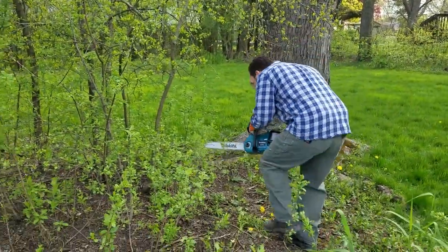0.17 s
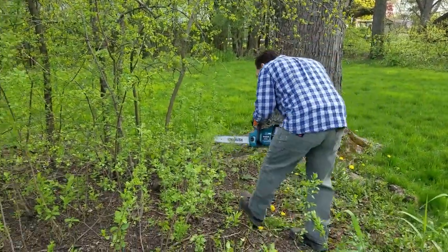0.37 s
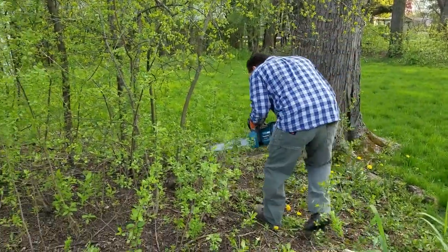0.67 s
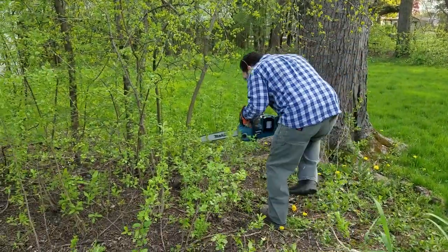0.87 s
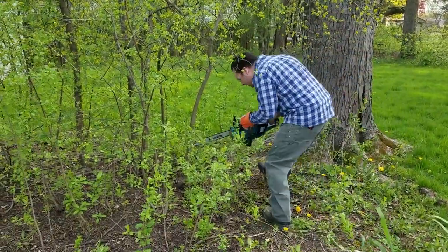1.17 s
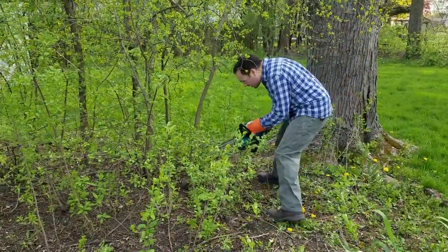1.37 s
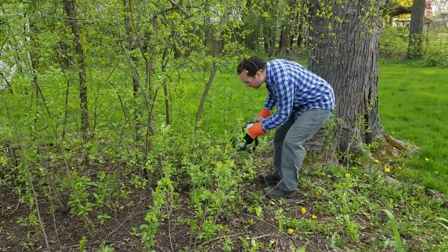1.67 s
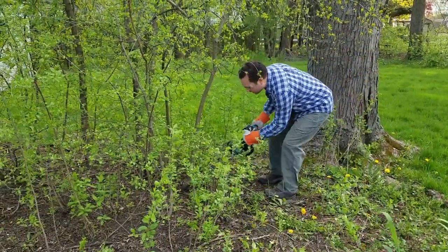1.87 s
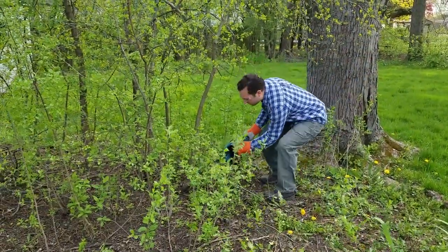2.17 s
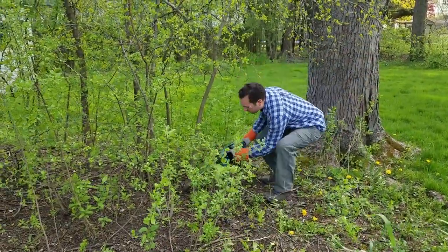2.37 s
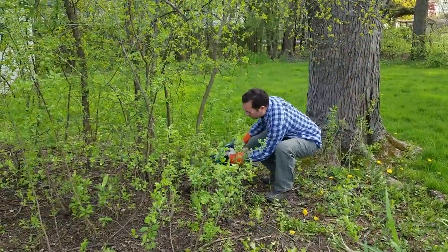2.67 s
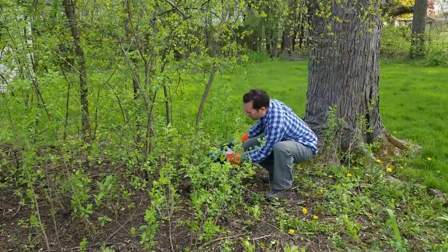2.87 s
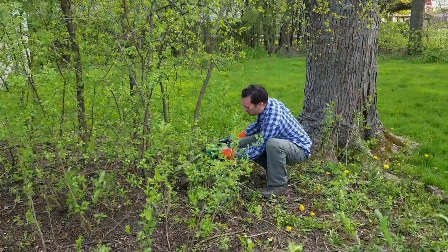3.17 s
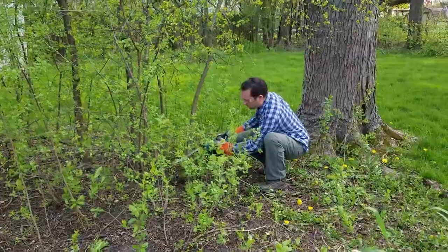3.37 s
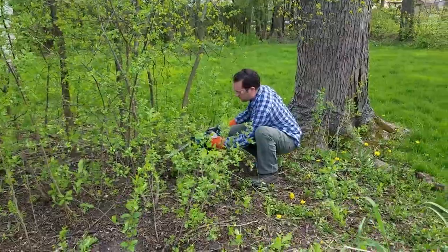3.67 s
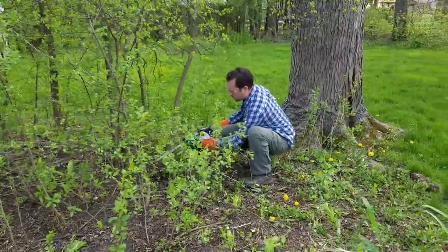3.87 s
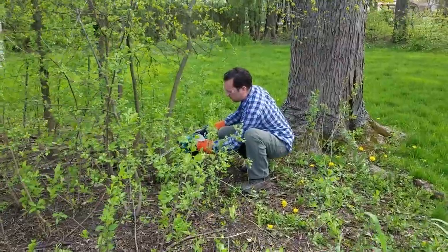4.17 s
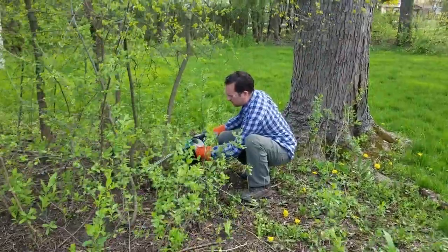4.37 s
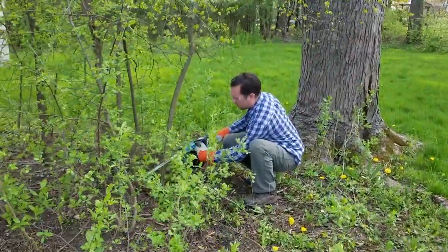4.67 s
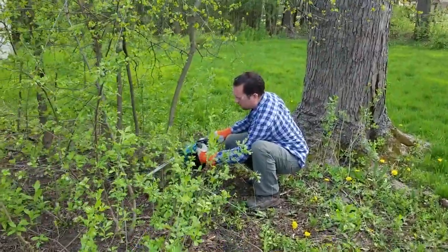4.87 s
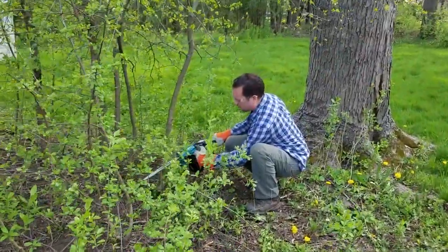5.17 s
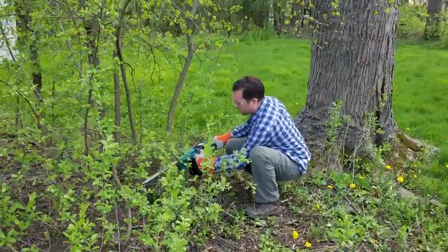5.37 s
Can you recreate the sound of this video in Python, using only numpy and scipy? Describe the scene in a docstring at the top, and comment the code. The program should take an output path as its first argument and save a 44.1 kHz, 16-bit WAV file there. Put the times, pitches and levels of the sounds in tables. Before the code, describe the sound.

Twigs and dry leaves crackle underfoot before a cordless chainsaw starts, whining and rattling steadily as its chain bites into garden shrubs.

```python
"""A garden: a man steps through dry twigs and leaves, then starts a cordless chainsaw a few metres away.
The slack chain clacks; the motor chirps through the housing's resonances and settles into a whine.
The chain rattles and hisses round its bar and churns harder once it bites into the brush.
A low outdoor rumble and the hush of the open air lie under it all."""
import sys
import numpy as np
from scipy import signal
from scipy.fft import rfft, irfft, next_fast_len
from scipy.io import wavfile
from scipy.ndimage import uniform_filter1d, map_coordinates

SR = 44100
rng = np.random.default_rng(int(sys.argv[2]) if len(sys.argv) > 2 else 0)


def generate_wav(signal):
    """Clip the signal to [-1, 1] and save it as 16-bit WAV at the path in sys.argv[1]."""
    frames = np.transpose(np.atleast_2d(signal))
    scaled = np.clip(frames, -1, 1) * 32767
    pcm = np.round(scaled).astype(np.int16)
    wavfile.write(sys.argv[1], SR, pcm)


N = 243873
T = np.arange(N) / SR
TRIGGER_S, LAUNCH_S = 2.075, 2.16  # the chain creeps, then the motor takes off
CREEP_HZ, GOVERNED_HZ = 6, 179  # shaft speeds
SIDES = np.array([[.5], [-.5]])  # splits a level or phase gap between left and right

# body of dry wood: (frequency [Hz], level [dB])
WOOD = [(300, -30), (700, -2), (950, 0.5), (1400, -0.5), (2050, -3.5), (2700, -5.5), (3500, -12.5),
        (5000, -33), (16000, -73)]
# bright edge of dry splinters: (frequency [Hz], level [dB])
SPLINTER = [(2500, -14), (4000, -1.5), (6000, 3.5), (8000, -2.5), (11000, 6), (13500, -3.5), (16000, -5.5)]
# stereo image of the chain and the leaves: (frequency [Hz], left-right likeness [0-1])
NEAR_LIKENESS = [(150, 1), (400, 1), (1300, 0.93), (2100, 0.42), (2600, 0.82), (3000, 0.74), (5400, 0.38),
                 (8000, 0.21), (15000, 0.13)]
# ring of the chain knocking on its bar: (frequency [Hz], level [dB])
CLACK_COLOUR = [(240, -55), (400, -12), (612, -14), (1040, 0), (1880, 0.5), (2360, -6), (2620, -1.5),
                (3450, -19), (7240, -26), (8060, -17.5), (15000, -43)]


def amp(db):
    """Decibels to gain."""
    return 10 ** (np.asarray(db) / 20)


def unit(x):
    """Scale to rms 1."""
    return x / np.sqrt(np.mean(x ** 2) + 1e-20)


def along(points, hz):
    """Read (frequency, value) points on a log axis."""
    freqs, values = np.transpose(points)
    return np.interp(np.log(hz + 1), np.log(freqs + 1), values)


def automation(points):
    """Read (time, value) points at every sample."""
    return np.interp(T, *np.transpose(points))


def wobble(rate):
    """A smooth random curve, rate knots a second."""
    return map_coordinates(rng.standard_normal(int(N * rate / SR) + 4), [T * rate])


def filtered(x, response):
    """Filter x by a complex response of frequency."""
    size = next_fast_len(N + SR // 2)
    return irfft(rfft(x, size) * response(np.fft.rfftfreq(size, 1 / SR)), size)[..., :N]


def coloured(x, spectrum):
    """EQ x by a spectrum, at rms 1."""
    return unit(filtered(x, lambda hz: amp(along(spectrum, hz))))


def resonance(hz, centre, width):
    """The complex response of one mode."""
    return 1j * hz * width / (centre ** 2 - hz ** 2 + 1j * hz * width)


def peaked(spectrum, pitch, lift_db):
    """A spectrum with one resonance raised above it."""
    hz = np.geomspace(100, 16000, num=200)
    bell_db = lift_db * np.abs(resonance(hz, pitch, .18 * pitch))
    return np.transpose([hz, along(spectrum, hz) + bell_db])


def pair(x, likeness):
    """Two unrelated signals become left and right of a given likeness."""
    turn = lambda hz: np.arccos(np.clip(along(likeness, hz), -1, 1)) / 2
    mid, side = filtered(x, lambda hz: np.array([np.cos(turn(hz)), np.sin(turn(hz))]))
    return np.array([mid + side, mid - side])


def add(track, s, x):
    """Mix x into the track at s seconds."""
    part = track[:, round(s * SR):][:, :x.shape[1]]
    part += x[:, :part.shape[1]]


def garden():
    """The bed: an uneven low rumble and the gently wavering hush of the open air."""
    # swell of the rumble: (time [s], relative level [dB])
    swell = [(0.0, -38.5), (0.21, -41), (0.49, -44), (0.68, -49.5), (1.43, -47.5), (1.89, -45.5),
             (2.19, -44), (3.43, -55.5), (4.24, -44.5), (5.53, -43)]
    # tone of each layer: (frequency [Hz], level [dB])
    rumble_colour = [(13, -39), (22, -17), (59, -5.5), (87, 2), (133, -2), (244, -10.5), (336, -10),
                     (468, -13.5), (530, -22.5), (600, -23), (780, -47), (1320, -120)]
    air_colour = [(150, -26), (250, -7), (380, -3.5), (520, -8.5), (780, -3), (1400, -13), (2200, -13),
                  (3500, -25), (5500, -27), (7800, -30.5), (9700, -20), (12000, -28), (15500, -23.5)]
    # their stereo image: (frequency [Hz], left-right likeness [1 and up is mono])
    rumble_likeness = [(30, 3), (70, 0.32), (140, 0.86), (300, 0.8)]
    air_likeness = [(60, 0.64), (180, 0.59), (550, 0.56), (1650, -0.15), (4970, -0.049), (15000, -0.15)]
    # lean of the rumble: (frequency [Hz], left over right [dB])
    rumble_pan = [(40, 3), (90, -3.5), (180, 0)]
    rumble = coloured(pair(rng.standard_normal((2, N)), rumble_likeness), rumble_colour)
    rumble = filtered(rumble, lambda hz: amp(SIDES * along(rumble_pan, hz)))
    rumble *= amp(automation(swell) + 2.5 + 2 * wobble(17))
    air_gain = amp(-45 + .54 * wobble(7.4))
    air = coloured(pair(rng.standard_normal((2, N)), air_likeness), air_colour)
    return rumble + air_gain * air


def thumps():
    """Dull thumps near the ground, and twigs knocking on the bar as it enters the brush: damped sines, leading
    on the left, louder on the right."""
    # each thump or knock: (time [s], level before panning [dB], pitch [Hz])
    hits = [(.02, -19, 188), (0.044, -25, 392), (.178, -26, 105), (.212, -25, 150), (.233, -26, 110),
            (1.707, -30, 101), (2.21, -31.5, 332), (2.294, -26, 140), (2.608, -24.5, 101),
            (4.075, -27, 620), (4.118, -24, 724)]
    attack_s, t60, lead_rad = .00064, .052, 1.1
    out = np.zeros((2, N))
    t = np.arange(SR // 8) / SR
    for s, db, pitch in hits:
        envelope = amp(db - 60 * t / t60) * (1 - np.exp(-t / attack_s))
        add(out, s, envelope * np.sin(2 * np.pi * pitch * t + lead_rad * SIDES) * amp([[-2], [1.5]]))
    return out


def ring(spectrum, size=1024):
    """The minimum-phase impulse response of a spectrum, energy 1."""
    cepstrum = irfft(np.log(amp(along(spectrum, np.fft.rfftfreq(size, 1 / SR)))))
    impulse = irfft(np.exp(rfft(2 * cepstrum[:size // 2], size) - cepstrum[0]))
    return impulse / np.linalg.norm(impulse)


def snap(spectrum, t60, scatter):
    """A sharp break and its brief scatter off the ground and stems, mono peak 1."""
    t = np.arange(SR // 10) / SR
    burst = scatter * rng.standard_normal((2, len(t))) * amp(-60 * t / t60)
    burst = (burst + burst.mean(axis=0)) / np.sqrt(2)
    burst[:, 0] += 1  # the direct click
    crack = signal.fftconvolve(burst, ring(spectrum)[None], axes=1)
    return crack / np.abs(crack.mean(axis=0)).max()


def twigs():
    """Twigs break underfoot, each a woody crack with a splintery top."""
    # each break: (time [s], relative wood level [dB], relative splinter level [dB], pitch [Hz])
    breaks = [(0.317, -45, -47, 851), (0.423, -19.5, -36, 2200), (0.437, -28, -43, 2200),
              (0.465, -24, -46, 2060), (0.496, -26, -41, 840), (0.507, -25, -38, 2070),
              (0.523, -24, -40, 2010), (0.663, -31.5, -44, 964), (1.156, -26.5, -40, 2070),
              (1.177, -25.5, -41, 2130), (1.219, -31, -41, 1170), (1.259, -18.5, -41, 1930),
              (1.325, -25, -46, 1880), (1.343, -30, -50, 921), (1.353, -30, -53, 1920),
              (1.361, -25, -48, 1320), (1.698, -16, -38, 1840), (1.783, -25, -35, 875)]
    out = np.zeros((2, N))
    for s, wood_db, splinter_db, pitch in breaks:
        add(out, s, amp(wood_db - 1.5) * snap(peaked(WOOD, pitch, lift_db=11), t60=.022, scatter=.08))
        add(out, s, amp(splinter_db + 15) * snap(SPLINTER, t60=.015, scatter=.12))
    # smaller sticks give way at random while he walks
    for s, db in zip(rng.uniform(.3, 2.05, size=22), rng.normal(-41, 1, size=22)):
        stick = snap(WOOD, t60=.025, scatter=.1) + snap(SPLINTER, t60=.016, scatter=.11)
        add(out, s, amp(db) * stick)
    return out


def leaf_litter():
    """Dry leaves crushed by the feet crackle in clumps of tiny grains."""
    # each crunch: (peak time [s], rise [s], level [dB], crisp over dull [dB], pitch [Hz])
    crunches = [(0.427, .006, -40, 3.5, 2200), (.515, .02, -49.5, 5, 2100),
                (.856, 0.0018, -38.5, -27, 1180), (1.223, 0.0033, -45, 4.5, 1100),
                (1.263, .003, -42, -4, 1900), (1.348, 0.021, -37.5, -2.5, 2010),
                (1.686, 0.024, -43, 6, 1800), (1.787, 0.0049, -47, 1, 2000), (1.85, 0.017, -48, 2.5, 2000)]
    decay_s = .028
    grains = rng.standard_normal((2, N)) * (rng.random(N) < .06) * amp(1.8 * wobble(220))
    crisp = coloured(grains, SPLINTER)
    narrowed = pair(grains, NEAR_LIKENESS)
    out = np.zeros((2, N))
    for s, rise_s, db, crisp_db, pitch in crunches:
        envelope = np.exp(np.minimum((T - s) / rise_s, (s - T) / decay_s))
        dull = coloured(narrowed, peaked(WOOD, pitch, lift_db=14.5))
        out += amp(db) * envelope * (dull + amp(crisp_db) * crisp)
    return out


def clacks():
    """The trigger clicks, and the slack chain knocks against the bar on its first slow turn."""
    # the chain takes up its slack: (time [s], peak level [dB])
    knocks = [(2.0728, -26), (2.086, -23), (2.104, -19), (2.1167, -26), (2.125, -19.5)]
    out = np.zeros((2, N))
    add(out, 2.081, amp(-22) * snap(SPLINTER, t60=.013, scatter=.17))
    for s, db in knocks:
        add(out, s, amp(db) * snap(CLACK_COLOUR, t60=.02, scatter=.14))
    return out


def patchy(x, depth_db):
    """Reflections off moving leaves and the bar lift and sink narrow bands for a moment."""
    bands = signal.stft(x, nperseg=1024)[2]
    patches = uniform_filter1d(rng.standard_normal(bands.shape[1:]), size=4, axis=0)
    patches = uniform_filter1d(patches, size=22, axis=1)
    return signal.istft(bands * amp(depth_db * unit(patches)), nperseg=1024)[1][:, :N]


def links(angle, spectrum, beat, patchy_db):
    """Countless link contacts, bunched three times a shaft turn, ring the bar."""
    bunching = 1 + beat * np.cos(3 * angle)
    contacts = rng.standard_normal((2, N)) * bunching * amp(.64 * wobble(120))
    return coloured(patchy(pair(contacts, NEAR_LIKENESS), patchy_db), spectrum)


def noise_band(centre_hz, width_hz):
    """Noise ringing in one narrow mode, rms 1."""
    return unit(filtered(rng.standard_normal(N), lambda hz: resonance(hz, centre_hz, width_hz) ** 2))


def chain(speed, angle, strain, load):
    """The chain rattles on the bar, hisses in its groove and churns in the brush."""
    # tone of each layer, low to high: (frequency [Hz], level [dB])
    churn_colour = [(110, -18), (170, -4.5), (250, -8), (310, -6.5), (365, 2.5), (440, -10), (620, -4),
                    (720, 4), (900, -19.5)]
    free_rattle = [(450, -29), (650, -17), (850, -6), (1150, -4), (1500, 0), (1900, 3.5), (2300, -0.5),
                   (2650, -2.5), (2950, -4), (3500, -67)]
    cutting_rattle = [(450, -24.5), (650, -20), (800, -7.5), (1150, -8.5), (1550, -1.5), (1800, -1.5),
                      (2050, -3), (2600, -2.5), (2850, -3.5), (3050, -16.5), (3500, -31)]
    hiss_colour = [(2400, -36), (3100, 0), (3800, 1), (4700, 0.5), (5400, 3), (6100, -0.5), (7000, -2.5),
                   (7600, -4), (8500, -20)]
    fizz_colour = [(6600, -45), (7600, -4.5), (8600, 3), (9900, 0.5), (11200, -1.5), (12800, -5.5),
                   (14500, -3.5), (16000, -6)]
    # their faders: (full-speed level [dB], per speed doubling [dB], strain lift [dB], load lift [dB])
    churn_law = (-52.5, 1.5, 15, 15.5)
    rattle_law = (-27, 1.6, 4, 4.5)
    hiss_law = (-30, 6, 4, 4)
    fizz_law = (-24, 8, 2, 4.5)
    doublings = np.log2(speed / GOVERNED_HZ)
    churn_db, rattle_db, hiss_db, fizz_db = [
        db + speed_db * doublings + strain_db * strain + load_db * load
        for db, speed_db, strain_db, load_db in (churn_law, rattle_law, hiss_law, fizz_law)]
    moving = np.clip((T - TRIGGER_S) / .05, 0, 1)
    # a slow chain rings the same few modes as its clacks; speed and load fill the gaps between them
    slow = np.clip((150 - speed) / 90, 0, 1)
    crawling = np.sqrt(slow) * links(angle, CLACK_COLOUR, beat=.3, patchy_db=1.5)
    free = np.sqrt((1 - slow) * (1 - load)) * links(angle, free_rattle, beat=.073, patchy_db=2)
    cutting = np.sqrt(load) * links(angle, cutting_rattle, beat=.15, patchy_db=.3)
    rattle = amp(rattle_db + .067 * wobble(9)) * (crawling + free + cutting)
    churn = amp(churn_db + 1.3 * wobble(6.7)) * links(angle, churn_colour, beat=.045, patchy_db=1)
    hiss = amp(hiss_db) * links(angle, hiss_colour, beat=.05, patchy_db=1.7)
    fizz = amp(fizz_db) * links(angle, fizz_colour, beat=.046, patchy_db=1.9)
    drone = amp(-44.5) * load * noise_band(171, width_hz=21)
    # the creeping chain scrapes one mode of the bar
    scrape = amp(-40.5) * noise_band(2620, width_hz=150) * np.clip(CREEP_HZ / speed, 0, 1)
    return moving * (rattle + churn + hiss + fizz + scrape) + drone


def housing_chirp(speed):
    """A high order of the shaft sweeps through the housing's resonances as the motor starts."""
    # housing resonances: (frequency [Hz], width [Hz], relative level [dB])
    modes = [(1290, 520, -1.5), (1780, 240, -2), (2610, 520, 2)]
    cog_hz = 48 * speed
    housing = sum(amp(db) / (1 + (2 * (cog_hz - hz) / width) ** 2) ** 2 for hz, width, db in modes)
    sweep = np.sin(2 * np.pi * np.cumsum(cog_hz) / SR)
    fade_in = np.clip((speed - 18) / 6, 0, 1)
    return amp(-14.5 + wobble(400)) * housing * sweep * fade_in


def tone(phase, db, flutter_db, drift):
    """A motor partial; moving leaves and the swinging bar make it flutter and drift in stereo."""
    apart = drift * wobble(2.925) * np.array([[1], [-1]])
    gain = np.sqrt(2) * amp(db + flutter_db * wobble(25))
    return gain * np.sin(phase + apart + rng.uniform(0, 2 * np.pi))


def motor_whine(speed, angle, strain, load):
    """The motor's magnetic whine climbs through the resonances of its can."""
    # whine partials: (order [per turn], free level [dB], cutting level [dB], strain lift [dB],
    # flutter [dB], jitter [rad], drift [rad], left over right [dB])
    partials = [(6, -41.5, -38, -2.5, 1.4, .02, 0.031, 1.5), (12, -35.5, -34, 4, 2, .05, 0.18, 1.5),
                (18, -43.5, -38, 6.5, 1.5, .2, 0.49, 0.5), (30, -45.5, -53, -12, 2.5, .35, 0.29, -1)]
    # peaks and notches of the can: (frequency [Hz], width [Hz], lift [dB])
    can = [(1085, 400, 8.5), (1550, 130, -5), (1753, 90, 9.5), (1880, 110, -5), (2046, 84, 13),
           (2740, 400, 11), (5275, 460, 12)]
    whine = 0
    for order, free_db, cut_db, strain_db, flutter_db, jitter, drift, pan_db in partials:
        can_db = sum(db * np.abs(resonance(order * speed, hz, width)) ** 2 for hz, width, db in can)
        level_db = free_db + load * (cut_db - free_db) + strain_db * strain + can_db
        level_db += .42 * flutter_db * wobble(6)
        phase = order * angle + jitter * wobble(60)
        whine += tone(phase, level_db, flutter_db + strain, drift) * amp(pan_db * SIDES)
    return whine


def drive_tones(speed, angle, strain, load):
    """The drive's weaker tones, which ring out while the shaft is still gaining speed."""
    # drive partials: (order before rounding [per turn], free level [dB], cutting level [dB])
    partials = [(2, -69, -51.5), (3, -62, -46.5), (5, -77, -45), (7, -38, -64), (9, -45, -35),
                (10, -45, -41), (11, -40, -61), (13, -64, -44), (15, -46, -44), (21, -40.5, -68),
                (23.99, -46, -41.5), (36, -57, -40)]
    surge_db = 6
    drive = 0
    for order, free_db, cut_db in partials:
        phase = round(order) * angle + .3 * wobble(40)
        drive += tone(phase, free_db + load * (cut_db - free_db), flutter_db=2, drift=.017 * order)
    return speed / GOVERNED_HZ * amp(surge_db * np.sqrt(strain)) * drive


def shaft_speed(load):
    """Turns a second: a creep, a full-current ramp, an easing up to the governor, a sag under load."""
    ramp_hz_per_s, knee_hz, free_hz, ease_s, sag_hz = 550, 122, 181.5, .153, 1.25
    ramp = np.clip(ramp_hz_per_s * (T - LAUNCH_S), CREEP_HZ, knee_hz)
    past_knee_s = np.maximum(T - LAUNCH_S - knee_hz / ramp_hz_per_s, 0)
    easing = (free_hz - knee_hz) * (1 - np.exp(-past_knee_s / ease_s))
    return np.minimum(ramp + easing, GOVERNED_HZ) - sag_hz * load


def place_saw(saw, load):
    """The body between two microphones shades and delays the saw; the delay shifts as it is lowered."""
    # saw held clear, and lowered into the brush: (frequency [Hz], left lead [rad])
    clear_phase = [(1900, 0), (2760, .3), (3100, 2.6), (4300, 4.4), (5340, 2.9), (7200, 2.4), (9000, 1.2),
                   (11000, -.7)]
    lowered_phase = [(1640, 0), (2150, .7), (2700, 2.2), (3100, 4.5), (4500, 4.9), (5400, 3.5), (7300, 2.8),
                     (9300, 1.6), (11000, -.7)]
    # shading of the saw: (frequency [Hz], left over right [dB])
    pan = [(500, -1), (1200, -0.5), (1800, 2.5), (2800, 5.5), (3600, -3), (4500, -6), (5500, -4.5),
           (6400, 5.5), (7200, 7), (8500, 5), (10000, 2), (13000, -1.5), (15000, 0)]
    hz, t, bands = signal.stft(saw, SR, nperseg=1024)
    lowered = np.clip(np.interp(t, T, load) / .75, 0, 1)
    lead = np.outer(along(clear_phase, hz), 1 - lowered) + np.outer(along(lowered_phase, hz), lowered)
    sides = SIDES[:, :, None]
    gain = amp(sides * along(pan, hz)[:, None])
    gain /= np.sqrt(np.mean(gain ** 2, axis=0))  # constant power
    return signal.istft(bands * gain * np.exp(1j * sides * lead), SR, nperseg=1024)[1][:, :N]


def scene():
    """Footsteps over the garden bed, then the saw: one shaft drives its tones and its chain."""
    # how hard the chain bites: (time [s], load [0-1])
    bite = [(3.62, 0), (3.85, 0.57), (4.08, 0.82), (4.22, 0.8), (4.9, .87), (5.35, 0.99), (5.53, 0.91)]
    load = automation(bite)
    speed = shaft_speed(load)
    # the strain of spinning up comes on fast and lets go towards full speed
    strain = np.clip((T - LAUNCH_S) / .076, 0, 1) * np.clip((1 - speed / GOVERNED_HZ) / .57, 0, 1)
    tremble_hz = (.12 + .2 * load) * wobble(20)  # the biting chain shakes the shaft
    angle = 2 * np.pi * np.cumsum(speed + tremble_hz) / SR
    shaft = speed, angle, strain, load
    running = np.clip((speed - 62) / 14, 0, 1)
    motor = running * (motor_whine(*shaft) + drive_tones(*shaft)) + housing_chirp(speed)
    saw = motor + chain(*shaft) + clacks()
    return place_saw(saw, load) + thumps() + twigs() + leaf_litter() + garden()


def record(dry):
    """A brick-wall low-pass takes off the very top."""
    return filtered(dry, lambda hz: hz < 15850)


dry = scene()
out = record(dry)
generate_wav(out)
```